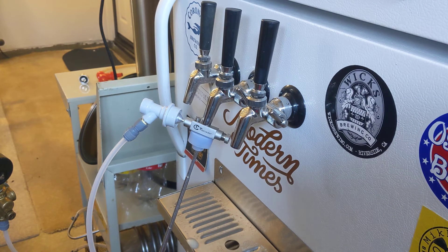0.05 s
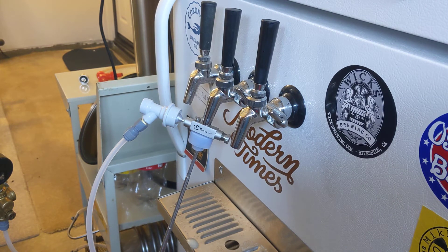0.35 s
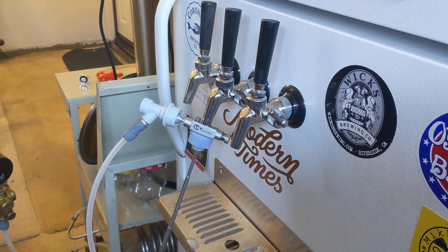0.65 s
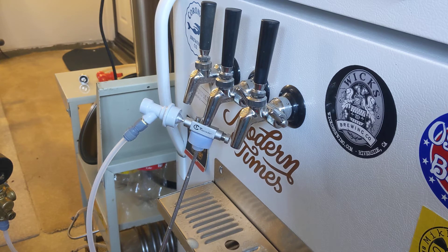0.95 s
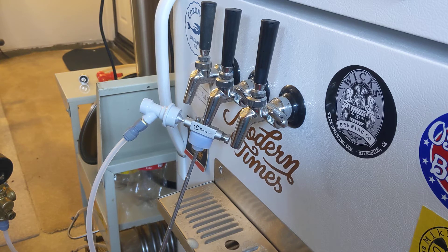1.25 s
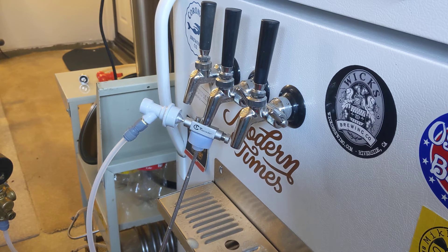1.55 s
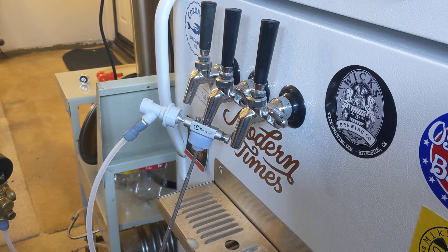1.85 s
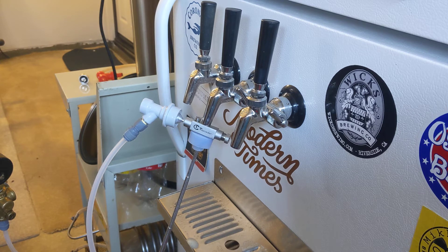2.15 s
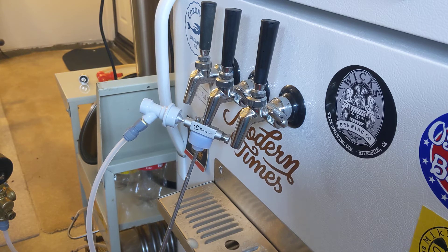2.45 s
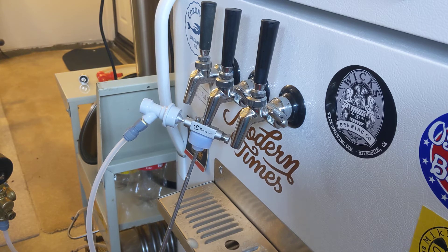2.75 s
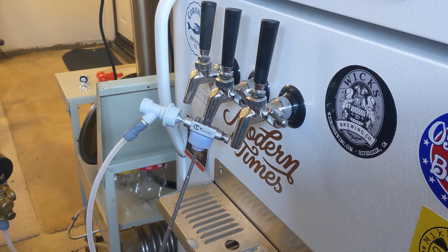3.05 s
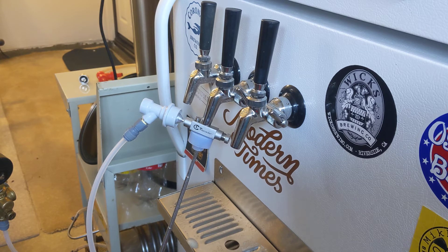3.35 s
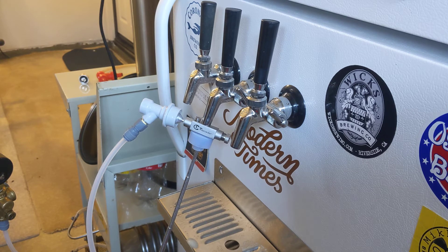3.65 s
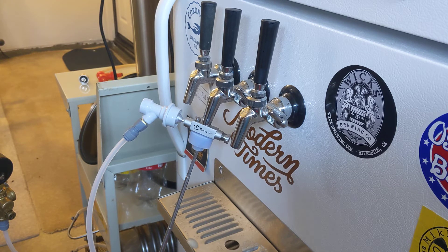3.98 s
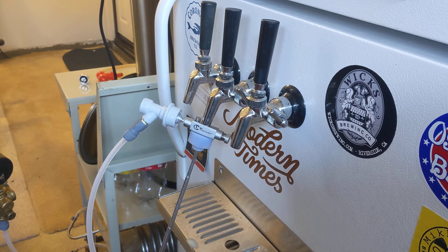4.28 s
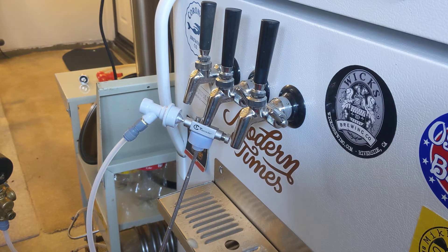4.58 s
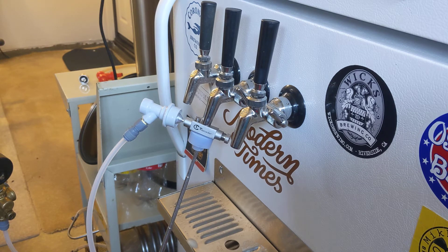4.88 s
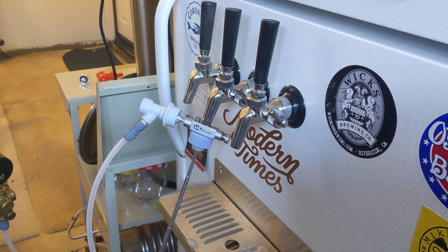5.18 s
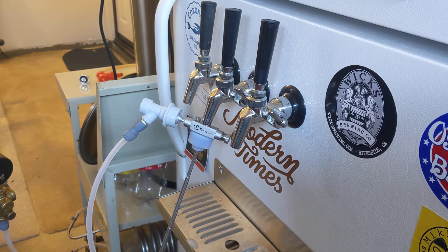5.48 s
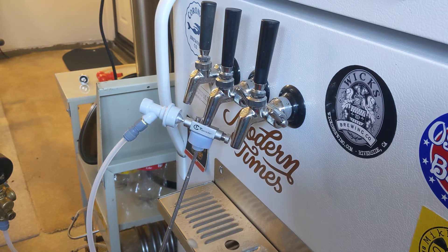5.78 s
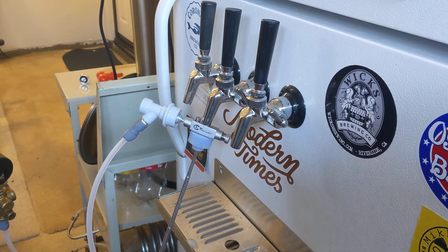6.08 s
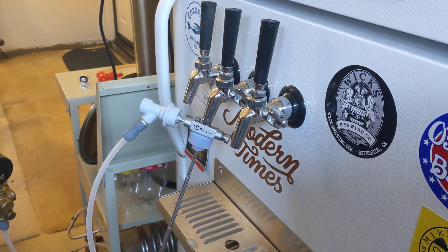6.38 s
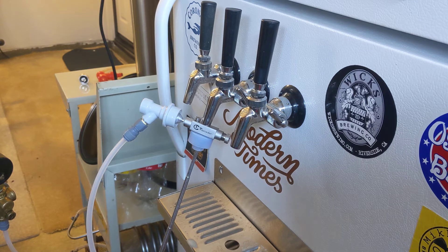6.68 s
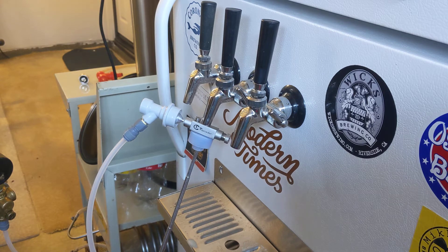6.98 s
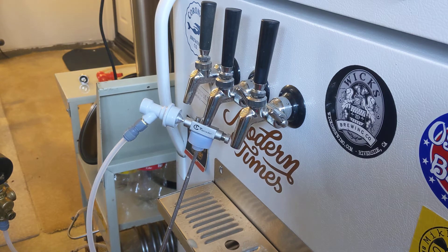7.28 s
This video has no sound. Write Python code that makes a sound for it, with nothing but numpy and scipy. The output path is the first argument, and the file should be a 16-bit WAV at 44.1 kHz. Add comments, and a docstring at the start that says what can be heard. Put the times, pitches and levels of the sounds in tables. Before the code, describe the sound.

Soft drops plink on a hollow metal tray, further and further apart, while equipment is handled some distance from the microphone in a slightly echoing room. Light knocks and rustles lead to a metallic snap with thuds, followed by a ringing, squeaky clatter of metal. A quick scrape ends in a sharp click, and finally a heavy lid slams down, loud and briefly ringing.

```python
"""A hard-walled cellar room, where a beer tap drips ever more slowly onto steel above a hollow tray.
A few metres away, gear is shuffled, knocked and set down. A steel catch snaps, a metal vessel
clatters, squeaks and rings, something scrapes free, and at the end a heavy lid bangs shut.
Blows are bursts of shaped noise and ringing parts are fading tones. Nearly all of the handling
reaches the listener by way of the walls."""
import sys
import numpy as np
from scipy import signal
from scipy.fft import rfft, irfft, next_fast_len
from scipy.io import wavfile
from scipy.ndimage import map_coordinates

SR = 44100
rng = np.random.default_rng(int(sys.argv[2]) if len(sys.argv) > 2 else 0)


def dump(signal):
    """Clip the signal to [-1, 1] and save it as 16-bit WAV at the path in sys.argv[1]."""
    limited = np.clip(np.atleast_2d(signal).T, -1, 1)
    pcm = np.round(limited * 32767).astype(np.int16)
    wavfile.write(sys.argv[1], SR, pcm)


N = 323253
T = np.arange(int(.9 * SR)) / SR  # the seconds of one short sound


def amp(db):
    """Turn decibels into a gain."""
    return 10 ** (np.asarray(db) / 20)


def fade(t60):
    """A short sound dying away: t60, the fade time, is the seconds it takes to fall 60 dB."""
    return amp(-60 * T / t60)


def unit(x):
    """Scale a sound to an average (rms) level of 1."""
    return x / np.sqrt(np.mean(x ** 2) + 1e-20)


def along(points, hz):
    """Read between (Hz, value) points, with every octave equally wide."""
    freqs, values = np.transpose(points)
    return np.interp(np.log(hz + 1), np.log(freqs + 1), values)


def wobble(rate):
    """A smooth curve through `rate` random values a second."""
    return map_coordinates(rng.standard_normal(int(N * rate / SR) + 4), [np.arange(N) * rate / SR])


def filtered(x, response):
    """Shape a sound with a response: a function that gives the gain at each frequency."""
    n = x.shape[-1]
    padded = next_fast_len(n + SR // 10)
    return irfft(rfft(x, padded) * response(np.fft.rfftfreq(padded, 1 / SR)), padded)[..., :n]


def colour(points):
    """The response that runs through (Hz, dB) points."""
    return lambda hz: amp(along(points, hz))


def resonances(peaks):
    """The response of an object that favours a few pitches, given as (Hz, width in Hz, dB)."""
    return lambda hz: sum(
        (-1) ** k * amp(db) * 1j * hz * width / (pitch ** 2 - hz ** 2 + 1j * hz * width)
        for k, (pitch, width, db) in enumerate(peaks))


def ripple(depth_db):
    """The chance peaks and dips of one object's many resonances; the deep bass stays smooth."""
    hz = np.linspace(np.sqrt(100), np.sqrt(17000), num=220) ** 2
    db = depth_db * (1 - 100 / hz) * rng.standard_normal(len(hz))
    return colour(np.column_stack([hz, db]))


def add(track, start, sound):
    """Mix a sound into the track, `start` seconds in."""
    first = max(round(start * SR), 0)
    track[:, first:first + sound.shape[-1]] += sound[..., :N - first]


# How alike the room sounds on the left and right. Each row: frequency in Hz, likeness (1 is identical).
LIKENESS = [(60, 0.91), (160, 0.96), (450, 0.5), (900, -0.074), (1600, -0.084), (3000, -0.035),
            (12000, -0.084)]
def side_angle(hz):
    """How far each side is out of step with the middle, in radians: least in the bass."""
    return np.arccos(np.clip(along(LIKENESS, hz), -1, 1)) / 2


def diffuse(response, size):
    """Noise arriving from all around: left and right agree only at low pitches."""
    def split(hz):
        return response(hz) * np.array([np.cos(side_angle(hz)), np.sin(side_angle(hz))])
    mid, side = filtered(rng.standard_normal((2, size)), split)
    return unit(np.array([mid + side, mid - side]))


# How long the cellar holds a sound. Each row: frequency in Hz, fade time in seconds.
ROOM_FADES = [(80, 0.54), (400, 0.61), (1500, 0.41), (5000, 0.42), (14000, 0.23)]
def room_tail(response):
    """Sound bouncing between the walls, with the treble dying first."""
    hz, t, spectrum = signal.stft(diffuse(response, len(T)), SR, nperseg=512)
    spectrum = spectrum * amp(-60 * t / along(ROOM_FADES, hz)[:, None])
    return signal.istft(spectrum, SR, nperseg=512)[1][:, :len(T)]


def echoes(x, wet_db):
    """The walls' answer to a sound."""
    tail = room_tail(np.ones_like)
    tail = tail / np.linalg.norm(tail[0])
    return amp(wet_db) * signal.fftconvolve(x[None], tail, axes=1)[:, :len(x)]


def blow(response, rise, t60, room_db):
    """A distant blow: many resonances build up over `rise` seconds and die, and the room hangs on."""
    swell = 1 - np.exp(-T / rise)
    shape = swell * fade(t60)
    body = unit(diffuse(response, len(T)) * shape)
    body *= np.sqrt(np.mean(shape ** 2))  # the force of the blow sets its energy
    return body + amp(room_db) * room_tail(response) * swell


def stroke(start, length, rise, t60):
    """The loudness of one movement: it swells, holds and dies away."""
    t = np.maximum(np.arange(N) / SR - start, 0)
    return (1 - np.exp(-t / rise)) * amp(-60 * np.maximum(t - length, 0) / t60)


def movements(rows, rest_db, rise, t60):
    """The joint loudness of (start, length, dB) movements over a quiet resting level."""
    power = sum((amp(db) * stroke(start, length, rise, t60)) ** 2 for start, length, db in rows)
    return np.sqrt(amp(rest_db) ** 2 + power)


# The tone of the still air. Each row: frequency in Hz, level in dB.
AIR_COLOUR = [(12, -40), (20, 5), (113, -11), (347, -30), (410, -32), (542, -13.5), (624, -31), (738, -18),
              (1220, -19), (3250, -33.5), (7730, -37), (14300, -28), (16000, -48)]
def air():
    """The room's still air: a faint, steady rumble and hiss."""
    return amp(-70.5) * diffuse(colour(AIR_COLOUR), N)


# The tone of shuffling. Each row: frequency in Hz, level in dB.
SHUFFLE_COLOUR = [(29, -66.5), (50, -12), (98, 2), (129, -8.5), (400, -12.5), (564, -11.5), (1020, -25),
                  (1390, -34), (2500, -27), (3250, -81), (5500, -120)]
# Soft movements. Each row: start in seconds, length in seconds, level in dB.
SHUFFLES = [(0, 0.044, -60), (0.1, 1.17, -69.5), (2.9, 0.28, -53.5), (3.2, 0.5, -64), (3.9, 0.066, -56),
            (4.1, 0.27, -62.5), (4.34, .12, -51), (4.56, 0.091, -55.5), (4.98, 0.23, -64),
            (7.14, 0.059, -69)]
def shuffling():
    """Soft movements between the blows make a low, uneven noise."""
    loudness = movements(SHUFFLES, rest_db=-76, rise=0.019, t60=0.68)
    return loudness * amp(3.1 * wobble(25)) * diffuse(colour(SHUFFLE_COLOUR), N)


# The tone of rustling. Each row: frequency in Hz, level in dB.
RUSTLE_COLOUR = [(410, -68), (700, -8), (1250, -9.5), (1360, -5), (2730, -9), (3370, -6.5), (7290, -14.5),
                 (13300, -14), (16000, -23)]
# Faint rustles. Each row: start in seconds, length in seconds, level in dB, brightness in dB.
RUSTLES = [(0, 0.087, -59.5, -0.5), (0.095, 1, -69, -0.5), (0.709, 0.25, -62, -1.5),
           (1.971, 0.054, -61.5, 5), (2.12, 0.072, -70, -3.5), (2.206, 0.011, -57.5, -0.5),
           (2.938, .15, -64.5, 0), (3.296, 0.18, -64.5, 3), (3.893, 0.053, -52.5, -6),
           (4.188, 0.15, -64.5, -1), (4.332, 0.14, -62, -2), (4.556, 0.14, -64, 2),
           (4.995, 0.43, -69.5, -1.5), (5.62, .12, -66.5, -1.5), (5.76, 0.055, -67, 1),
           (5.88, 0.49, -66, -0.5), (6.498, 0.41, -73, -2), (6.749, 0.12, -61.5, -2)]
def rustling(fizz_hz=6100):
    """Handled things give off grainy noise; brightness lifts its high fizz and lowers the rest."""
    grain_db = 2.2 * wobble(350) + 0.63 * wobble(46)
    grains = amp(grain_db) * diffuse(colour(RUSTLE_COLOUR), N)
    fizz = filtered(grains, lambda hz: hz ** 4 / (hz ** 4 + fizz_hz ** 4))
    start, length, db, bright_db = np.transpose(RUSTLES)
    dull = movements(zip(start, length, db - bright_db), rest_db=-75, rise=0.0079, t60=0.52)
    bright = movements(zip(start, length, db + bright_db), rest_db=-75, rise=0.0066, t60=0.4)
    return dull * (grains - fizz) + bright * fizz


def tick(pitch, snap_db, low_hz=1200):
    """A tiny bright contact: a direct snap, raised by snap_db, and its scatter round the room."""
    def response(hz):
        peak = 1 / np.sqrt(1 + (1.4 * (hz / pitch - pitch / (hz + 1))) ** 2)
        return peak / (1 + (low_hz / (hz + 1)) ** 2)  # small parts give off little bass
    snap = amp(snap_db) * diffuse(response, len(T)) * fade(0.006)
    return snap + blow(response, rise=0.00096, t60=0.082, room_db=0)


# Light touches. Each row: start in seconds, level in dB, pitch in Hz.
TOUCHES = [(0.039, -55.5, 6300), (0.409, -61, 11000), (3.055, -50, 5060), (3.793, -43, 11100),
           (4.585, -58.5, 5700), (4.682, -59.5, 11700), (5.039, -69, 9300), (5.072, -64, 8800),
           (5.1, -61, 8700), (5.228, -60.5, 10800), (5.339, -56.5, 2220), (5.341, -58, 8000),
           (5.4, -62, 5000), (5.487, -56, 11800), (5.489, -53.5, 3830), (5.674, -53.5, 5570),
           (5.991, -52, 7000), (6, -42.5, 3940), (6.061, -42, 11500), (6.459, -65, 4900)]
def ticks():
    """Small hard parts tick as they touch."""
    out = np.zeros((2, N))
    for start, db, pitch in TOUCHES:
        add(out, start, amp(db) * tick(pitch, snap_db=11))
    return out


# The tone all knocks share. Each row: frequency in Hz, level in dB.
GEAR_COLOUR = [(25, 1), (55, 1), (90, 4.5), (150, -1.5), (300, 0.5), (700, 3.5), (1100, 2.5), (2300, 2),
               (3200, 1), (7000, 3.5), (12000, 3), (16000, -18)]
def knock_tone(hz, low_hz, contact_ms):
    """A knocked piece sounds from its lowest resonance up; a longer contact makes it duller."""
    octaves = np.log2((hz + 1) / (1000 / contact_ms))
    tilt_db = np.where(octaves < 0, -3, -10) * octaves  # steeper above 1 / contact time
    boom_db = 5 * np.exp(-(np.log2((hz + 1) / low_hz) / 0.26) ** 2)  # a bump at the lowest resonance
    bass_cut = (1 + (low_hz / (hz + 1)) ** 2) ** -0.57
    return amp(tilt_db + boom_db) * bass_cut * colour(GEAR_COLOUR)(hz)


# The tone of a hard edge's click. Each row: frequency in Hz, level in dB.
CLICK_COLOUR = [(300, -31), (1400, -12), (3400, 3.5), (7000, -4), (12000, 4.5), (16000, -8.5)]
# Knocks. Each row: start in seconds, level in dB, lowest resonance in Hz, contact time in
# milliseconds, click level in dB, rise time in seconds, fade time in seconds.
GEAR_KNOCKS = [(0.0, -41, 763, 2, -58, 0.00062, 0.45), (0.865, -41, 97.3, 1.8, -33.5, 0.0054, 0.22),
               (1.346, -52, 100, 6, -92, .012, .29), (1.352, -48, 290, 4.5, -90, .01, 0.32),
               (2.211, -47, 3400, 0.19, -58, 0.0065, 0.21), (2.769, -27, 92, 2.5, -37, 0.01, 0.26),
               (2.817, -30.5, 225, 5.5, -61, .0025, 0.13), (2.882, -43, 225, 4, -75, .004, .2),
               (2.977, -45.5, 772, 2.2, -60, 0.0016, .3), (3.041, -48, 560, 2, -56.5, 0.0016, 0.26),
               (3.062, -33, 330, 1.2, -54, 0.0018, .3), (3.112, -42.5, 228, 2.5, -61.5, 0.0025, 0.53),
               (3.567, -56, 282, 1.1, -73, 0.0017, 0.3), (3.773, -41.5, 75, .8, -50.5, 0.0037, 0.5),
               (3.796, -33, 150, 0.41, -49, 0.0013, 0.52), (3.834, -29.5, 219.8, 1.37, -55, 0.0099, 0.46),
               (3.872, -32.5, 151, 0.69, -49, .004, 0.19), (3.905, -39.5, 214, 1, -52, 0.0026, 0.81),
               (5.099, -45.5, 96, 1.6, -57, 0.013, 0.27), (6.362, -44, 313, 3.1, -85, 0.00086, 0.26),
               (6.414, -53, 400, 0.64, -84, 0.0016, 0.4)]
def knocks():
    """Gear is bumped and set down: each piece thuds and rings, and its hard edges click."""
    out = np.zeros((2, N))
    for start, db, low_hz, contact_ms, click_db, rise, t60 in GEAR_KNOCKS:
        peaks = ripple(depth_db=3)
        thud = blow(lambda hz: knock_tone(hz, low_hz, contact_ms) * peaks(hz), rise, t60, room_db=-9)
        ring_db = -3.5 - 1.8 * np.log2(low_hz / 100)  # big, low pieces ring the most
        swell = 1 - np.exp(-T / rise)
        ring = amp(ring_db) * swell * fade(t60) * np.sin(2 * np.pi * low_hz * T)
        click = blow(lambda hz: colour(CLICK_COLOUR)(hz) * peaks(hz), rise, t60, room_db=-5)
        add(out, start, amp(db) * (thud + ring) + amp(click_db) * click)
    return out


# The catch's resonances before softening. Each row: pitch in Hz, width in Hz, level in dB.
CATCH_PEAKS = [(1550, 63, -1), (2265, 31, -1), (2540, 63, 2.5), (2900, 130, -1), (3686, 140, -3.5),
               (7700, 280, -6.5), (11700, 410, -20)]
# Its contacts. Each row: start in seconds, level in dB.
CATCH_CONTACTS = [(2.766, -40), (2.772, -31.5), (2.787, -32.5)]
def catch():
    """The steel catch grazes, snaps home in two contacts and rings briefly."""
    def softened(hz):
        return np.abs(resonances(CATCH_PEAKS)(hz)) ** 0.84
    out = np.zeros((2, N))
    for start, db in CATCH_CONTACTS:
        add(out, start, amp(db) * blow(softened, rise=0.0014, t60=0.13, room_db=-6))
    return out


# The vessel's ringing tones. Each row: pitch in Hz, level in dB, fade time in seconds.
VESSEL_TONES = [(1750, 6, 0.55), (1937, 10.5, 0.46), (2130, -4.5, 0.73), (2525, -3, 0.44), (3011, -8, 0.6),
                (3380, 1, 0.46), (3670, -6, 0.67), (4760, -10, 0.83), (5300, -6, 0.52), (5550, -13, 0.38),
                (7000, -14, 0.38), (7200, -10, 0.32), (7876, -5, 0.19), (8990, 0, 0.28), (9500, -12, .4),
                (10230, -15, 0.3), (10400, -17, 0.76), (12090, -21, 0.38), (13180, -7, 0.39)]
# Its blows. Each row: start in seconds, level in dB.
VESSEL_BLOWS = [(3.835, -48), (3.885, -51.5), (3.940, -52)]
def vessel():
    """The metal vessel rocks and rings, with a new balance of tones at every blow."""
    out = np.zeros((2, N))
    hz, level, t60 = np.transpose(VESSEL_TONES)[:, :, None]
    for start, db in VESSEL_BLOWS:
        strength = amp(level + rng.normal(0, 2.55, hz.shape))
        blur = np.cumsum(rng.normal(0, 0.038, (len(hz), len(T))), axis=1)  # rubbing blurs each pitch
        tones = strength * fade(t60) * np.sin(2 * np.pi * hz * T + blur)
        ring = tones.sum(axis=0) * (1 - np.exp(-T / 0.0019))
        add(out, start, amp(db) * (amp(-6.5) * ring + echoes(ring, wet_db=-2)))
    return out


# Squeaks. Each row: start in seconds, pitch in Hz, level in dB, length in seconds.
METAL_SLIPS = [(3.83, 3880, -43, 0.069), (3.875, 1990, -42.5, 0.024), (3.925, 3830, -47.5, 0.058),
               (3.935, 1788, -40, 0.025), (4.005, 1827, -47.5, 0.06), (4.015, 3770, -59, 0.08),
               (6.037, 3910, -34, 0.012)]
def squeaks():
    """Metal slips on metal: short chattering tones that sag in pitch and hang in the room."""
    out = np.zeros((2, N))
    for start, hz, db, length in METAL_SLIPS:
        progress = np.clip(T / length, 0, 1)
        sag = 0.01 * (.5 - progress)
        waver = .0035 * wobble(500)[:len(T)]
        chatter_db = 3 * wobble(300)[:len(T)]
        phase = 2 * np.pi * np.cumsum(hz * (1 + sag + waver)) / SR
        tone = sum(amp(level) * np.sin(k * phase) for k, level in enumerate([0, -22, -18, -22], 1))
        arch = np.sqrt(4 * progress * (1 - progress))
        squeak = amp(db + chatter_db) * arch * tone
        add(out, start, amp(-0.5) * squeak + echoes(squeak, wet_db=0))
    return out


# The tone of the drag. Each row: frequency in Hz, level in dB.
DRAG_COLOUR = [(100, -27.5), (250, -21), (500, -3), (1200, 4), (2300, 4.5), (3200, 3), (4500, 6),
               (7000, -7), (12000, -4), (16000, -10)]
# Snaps on coming free. Each row: delay in seconds, level in dB, pitch in Hz, direct snap boost in dB.
FREEING_SNAPS = [(0, -36, 5200, 19), (.002, -30.5, 10100, -7)]
def scrape(start=6.001, free_at=6.0809, ease_db_per_s=-160):
    """A part drags in quick slips, eases off and snaps free."""
    length = free_at - start
    elapsed = np.clip(np.arange(N) / SR - start, 0, length)
    loudness = amp(-36.5 + ease_db_per_s * elapsed) * stroke(start, length, rise=0.001, t60=.03)
    slips = unit(rng.standard_normal(N) * amp(3.7 * wobble(400)))
    peaks = ripple(depth_db=2.2)
    drag = loudness * unit(filtered(slips, lambda hz: colour(DRAG_COLOUR)(hz) * peaks(hz)))
    out = drag + echoes(drag, wet_db=0)
    for delay, db, pitch, snap_db in FREEING_SNAPS:
        add(out, free_at + delay, amp(db) * tick(pitch, snap_db))
    return out


# The tone of the lid's bang. Each row: frequency in Hz, level in dB.
BANG_COLOUR = [(29, -60), (50, -26), (135, -18.5), (329, -5.5), (418, -6.5), (545, -3), (802, -4),
               (927, -17), (1020, -6), (1120, -12), (1210, -15), (2210, -20.5), (2380, -27), (16000, -63)]
# Its panel's ringing tones. Each row: pitch in Hz, level in dB, fade time in seconds.
PANEL_TONES = [(232, -9.5, 0.43), (307.5, -5.5, 0.41), (344, -8, 0.47), (418, -9, 0.63), (473, 0.5, 0.53),
               (576, 3.5, 0.24), (683, -3.5, 0.2), (734, -1.5, 0.19), (790, -2, 0.28), (880, 0, 0.17),
               (1044, -11, 0.4), (1238, -11, 0.28), (1510, -16, 0.26), (1637, -11, 0.23)]
# Its contacts. Each row: start in seconds, level in dB.
LID_CONTACTS = [(7.241, -24), (7.2435, -20.5), (7.248, -17)]
def lid(ring_db=-3.5):
    """The heavy lid lands edge first, then flat: a broad bang, and the last contact rings its panel."""
    out = np.zeros((2, N))
    for start, db in LID_CONTACTS:
        add(out, start, amp(db) * blow(colour(BANG_COLOUR), rise=0.00066, t60=0.268, room_db=-5.5))
    start, db = LID_CONTACTS[-1]
    hz, level, t60 = np.transpose(PANEL_TONES)[:, :, None]
    lag = side_angle(hz) * rng.choice([-1, 1], hz.shape)  # each tone reaches the two sides out of step
    phase = rng.uniform(0, 2 * np.pi, hz.shape) + np.array([lag, -lag])
    tones = amp(level) * fade(t60) * np.sin(2 * np.pi * hz * T + phase)
    ring = tones.sum(axis=1) * (1 - np.exp(-T / 0.00074))
    add(out, start, amp(db + ring_db) * ring)
    return out


# The tones of the spot a drop hits. Each row: pitch in Hz, level in dB, fade time in seconds.
PLINK_TONES = [(1412, 1.5, 0.039), (1730, 1.5, 0.012), (2160, -13.5, 0.11), (2640, -23.5, 0.16)]
# The hollow tray's resonances. Each row: pitch in Hz, width in Hz, level in dB.
TRAY_PEAKS = [(193, 22, 6.5), (483, 106, -3), (830, 135, -2), (1074, 97, -4.5), (1360, 240, -7.5),
              (2210, 340, -16)]
# The drops. Each row: start in seconds, splash level in dB.
DROPS = [(0.1665, -83), (0.384, -61), (0.6515, -57), (0.9258, -56), (1.212, -61.5), (1.506, -69),
         (1.8407, -59), (2.1843, -67), (2.5349, -62), (2.928, -81), (3.341, -71), (4.2323, -84),
         (4.7132, -80), (5.2108, -87), (5.7329, -66), (6.275, -68), (6.8367, -82)]
def drips(settle_s=1.7, splash_hz=10800):
    """Each drop splashes and plinks on the steel; the hollow tray and the room answer more darkly."""
    out = np.zeros((2, N))
    for start, splash_db in DROPS:
        db = -53.5 + 4 * np.exp(-start / settle_s)  # the first drops land harder, then the flow settles
        ring = sum(amp(level + rng.normal(0, 1.85)) * fade(t60) * np.sin(2 * np.pi * hz * T)
                   for hz, level, t60 in PLINK_TONES)
        splat = amp(-5) * fade(0.014) * rng.standard_normal(len(T))
        plink = (ring + splat) * amp([[1.5], [-1.5]])  # a little to the left
        hollow = blow(resonances(TRAY_PEAKS), rise=0.0032, t60=0.36, room_db=-7.5)
        add(out, start, amp(db) * (plink + amp(-4.5) * hollow))
        pitch = splash_hz * np.exp(0.04 * rng.standard_normal())
        add(out, start, amp(splash_db) * tick(pitch, snap_db=12.5))
    return out


# The balance of the two sides. Each row: frequency in Hz, left level minus right level in dB.
BALANCE = [(100, 0.5), (350, 1.5), (650, 1.5), (1100, -0.5), (2200, 0), (4000, 4.5), (8000, 1.5),
           (13000, -2.5)]
def scene():
    """Everything in the cellar, a little stronger on the left."""
    mix = drips() + knocks() + ticks() + catch() + vessel() + squeaks() + scrape() + lid()
    mix += shuffling() + rustling() + air()
    return filtered(mix, lambda hz: amp(np.outer([.5, -.5], along(BALANCE, hz))))


def record(dry):
    """The very highest treble is cut off sharply."""
    top_hz = 16100
    return filtered(dry, lambda hz: 1 / np.sqrt(1 + (hz / top_hz) ** 300))


dry = scene()
out = record(dry)
dump(out)
```